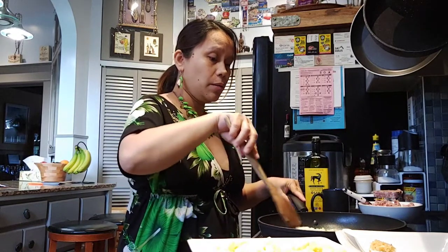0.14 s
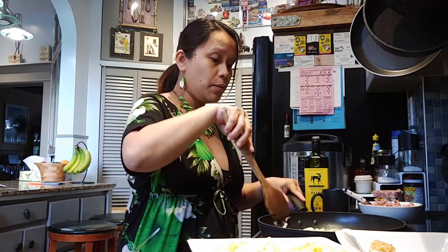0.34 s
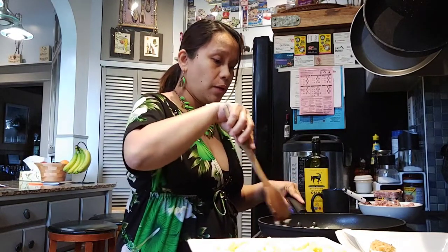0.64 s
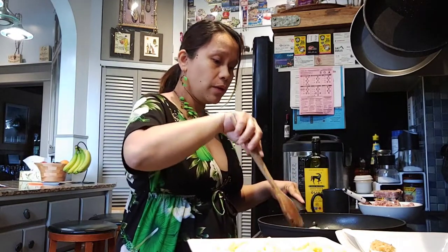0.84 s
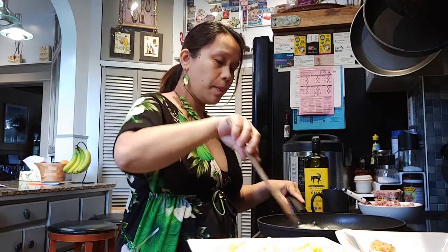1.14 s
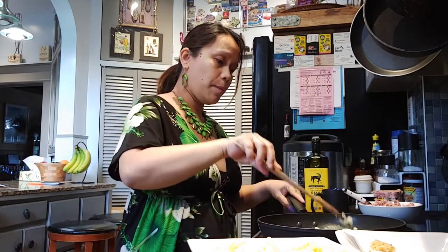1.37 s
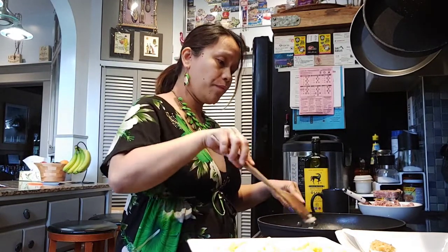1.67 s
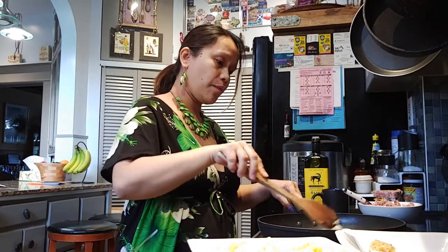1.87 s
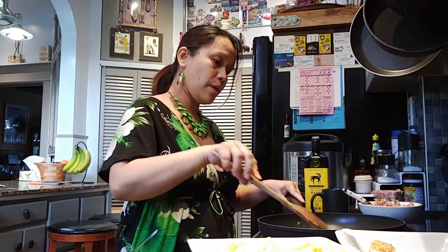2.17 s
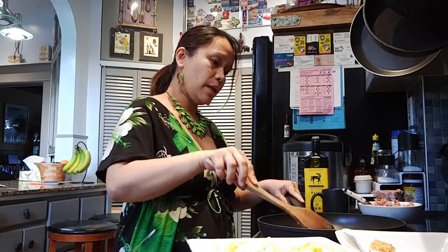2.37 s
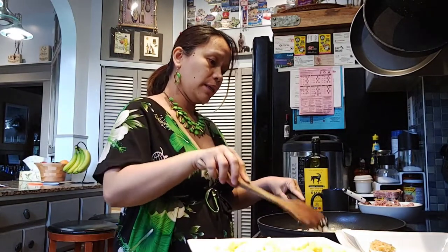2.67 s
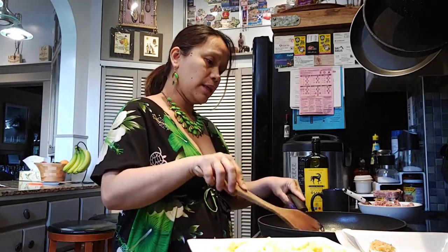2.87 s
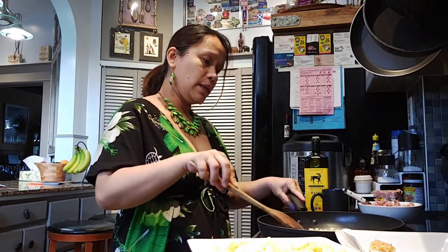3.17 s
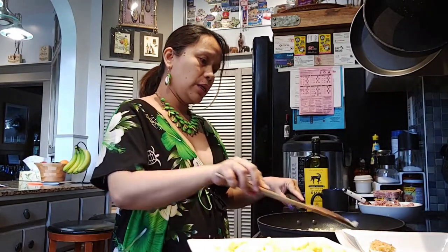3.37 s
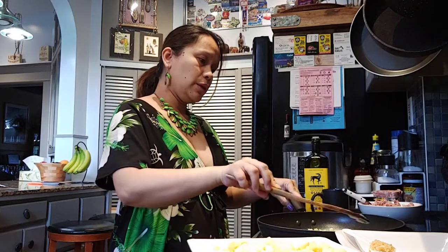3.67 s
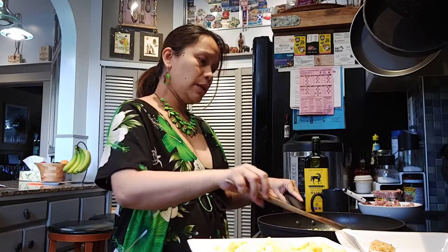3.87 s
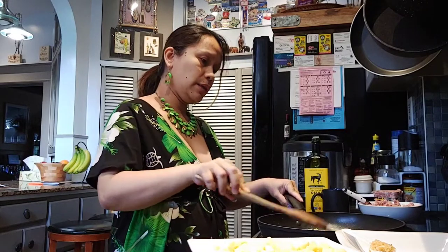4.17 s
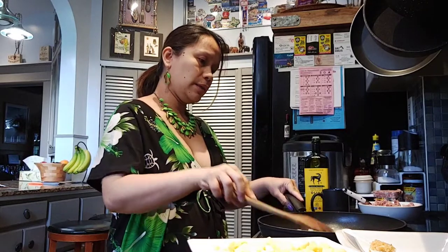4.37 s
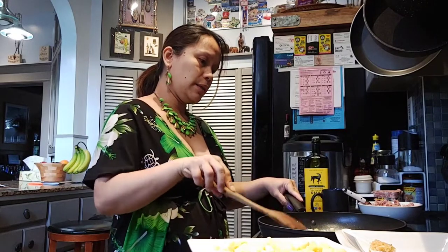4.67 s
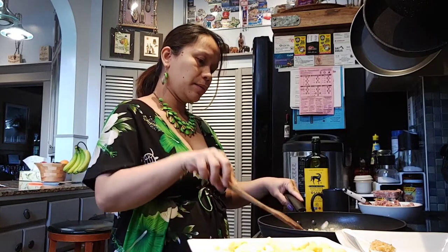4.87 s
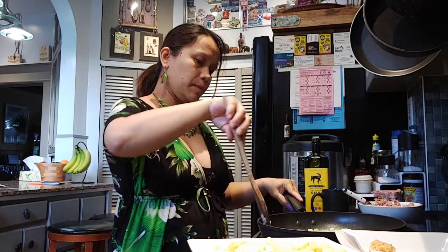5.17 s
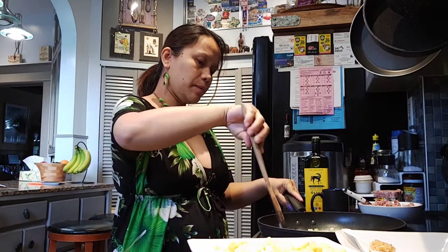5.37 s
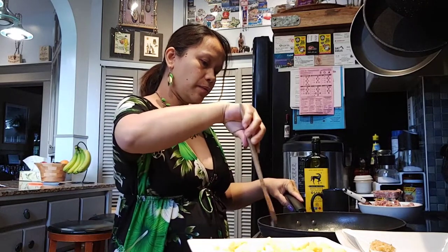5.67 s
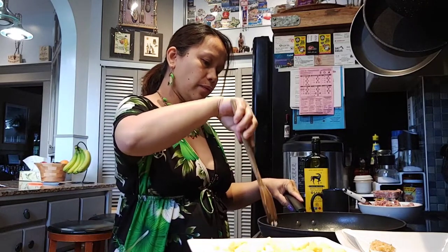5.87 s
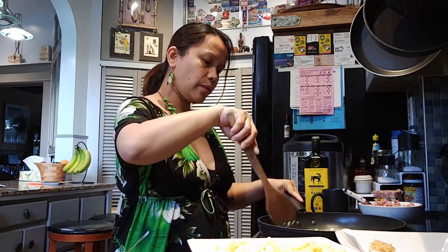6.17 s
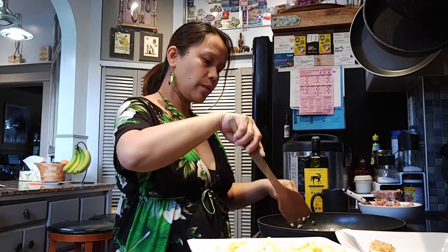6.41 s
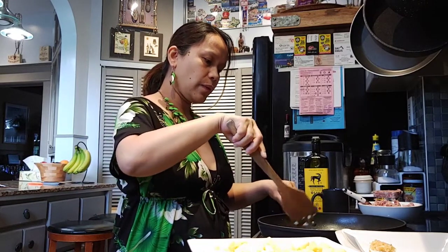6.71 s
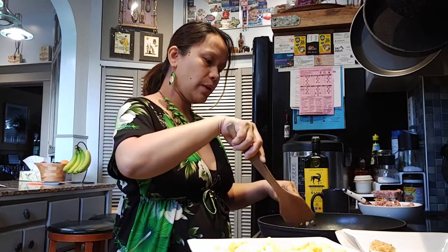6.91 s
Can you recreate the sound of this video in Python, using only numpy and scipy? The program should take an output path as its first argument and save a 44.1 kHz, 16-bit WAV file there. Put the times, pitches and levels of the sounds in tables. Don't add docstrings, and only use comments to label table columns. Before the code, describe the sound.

Close stereo sound of a wooden spatula stirring onions in a metal frying pan in a small tiled kitchen. A fine, bright sizzle and lower wet crackle run throughout, swelling briefly with the strokes, above quiet low room air and a faint appliance hum. Two firm woody knocks come at about 0.1 s, another at 0.5, with gritty scraping until 0.9. A ringing edge tap at 1.0 leads into hard double knocks at 1.1. From 1.4 to 2.5 it is calmer, with soft pushes; a knock at 2.6 and taps at 2.8 and 3.1 follow. Soft hollow pan rocking leads to taps at 3.9 and 4.3. Knock and tap at 4.6, then a sharp cluster of fat spits at 4.7. Ringing taps at 5.1, 5.55 and 5.9 surround a knock at 5.4; a strong clack at 6.0, weaker bumps to 6.5, and a final tap at 7.0.

```python
import sys
import numpy as np
from scipy import signal
from scipy.fft import rfft, irfft, next_fast_len
from scipy.io import wavfile
from scipy.ndimage import uniform_filter1d, map_coordinates

SR = 44100
rng = np.random.default_rng(int(sys.argv[2]) if len(sys.argv) > 2 else 0)


def wrap_up_sound(samples):
    columns = np.atleast_2d(samples).T
    tamed = np.clip(columns, -1, 1)
    steps = np.round(tamed * 32767).astype(np.int16)
    wavfile.write(sys.argv[1], SR, steps)


def field_ratio(decibels):
    return 10 ** (np.asarray(decibels, dtype=float) / 20)


N = 310720


def unit(x):
    return x / np.sqrt(np.mean(x ** 2) + 1e-20)


def along(points, hz):
    f, v = np.transpose(points)
    return np.interp(np.log(hz + 1), np.log(f + 1), v)


def wobble(rate):
    knots = rng.standard_normal(int(N * rate / SR) + 4)
    return map_coordinates(knots, [np.arange(N) * rate / SR])


def bell(s, length):
    return np.exp(-(2 * (np.arange(N) / SR - s) / length) ** 2)


def filtered(x, response):
    m = next_fast_len(N + SR // 2)
    return irfft(rfft(x, m) * response(np.fft.rfftfreq(m, 1 / SR)), m)[..., :N]


def grains(per_second, spread_db):
    size = field_ratio(spread_db * np.minimum(rng.exponential(size=N), 3))
    sign = rng.choice([-1, 1], size=N)
    return unit(size * sign * (rng.random(N) < per_second / SR))


# (frequency [Hz], likeness [-1 to 1])
PORT_LIKENESS = [(25, 1), (60, 1), (130, 0.96), (290, 0.89), (640, 0.41), (1410, -0.089), (3100, -0.16),
                 (6820, -0.021), (15000, -0.011)]


def rush(spectrum, grain, per_second, spread_db):
    clicks = grains(per_second, spread_db)
    echoes = rng.standard_normal((2, 400)) * field_ratio(-60 * np.arange(400) / SR / 0.049)
    spray = unit(signal.fftconvolve(clicks[None], echoes, axes=1)[:, :N])
    pair = np.sqrt(1 - grain) * rng.standard_normal((2, N)) + np.sqrt(grain) * spray

    def mid_and_side(hz):
        angle = np.arccos(np.clip(along(PORT_LIKENESS, hz), -1, 1)) / 2
        return field_ratio(along(spectrum, hz)) * [np.cos(angle), np.sin(angle)]

    mid, side = filtered(pair, mid_and_side)
    return unit(np.array([mid + side, mid - side]))


def ring(modes, t, scatter_db, attack, rough=0):
    hz, db, t60 = np.transpose(modes)[..., None]
    strength, detune = np.clip(rng.standard_normal((2, len(modes), 1)), -1.5, 1.5)
    blur = rough * np.cumsum(rng.standard_normal((len(modes), len(t))), axis=1) / np.sqrt(SR)
    phase = 2 * np.pi * hz * (1 + 0.0055 * detune) * t + blur
    tones = field_ratio(db + scatter_db * strength - 60 * t / t60) * np.sin(phase)
    return (tones[::2].sum(0) - tones[1::2].sum(0)) * (1 - np.exp(-t / attack))


def struck(modes, levels):
    return [(hz, db, t60) for (hz, t60), db in zip(modes, levels)]


def joined(modes, own):
    return [m for m in modes if abs(m[0] / own[0] - 1) > .12] + [own]


# (frequency [Hz], level [dB])
FLOOR_SLAP = [(100, 3), (190, -29), (320, -4), (560, -1.5), (900, -1), (1500, -5), (2600, -3.5),
              (3400, -23), (4200, -14), (5500, -27.5), (6500, -12.5), (9000, -58), (16000, -80)]


def slap(t, t60, tilt_db, spectrum=FLOOR_SLAP):
    hz = np.fft.rfftfreq(len(t), 1 / SR)
    colour = field_ratio(along(spectrum, hz) + tilt_db * np.clip(np.log2((hz + 1) / 1100), 0, 1))
    noise = unit(irfft(rfft(rng.standard_normal(len(t))) * colour, len(t)))
    return noise * field_ratio(-60 * t / t60) * (1 - np.exp(-t / 0.00037))


# (frequency [Hz], t60 [s])
ROOM_DECAY = [(100, 0.28), (400, 0.41), (800, 0.3), (1500, 0.36), (5000, 0.16), (12000, 0.074)]


def room(x):
    hz, t, z = signal.stft(rng.standard_normal((2, SR // 3)), SR, nperseg=256)
    tail = signal.istft(z * field_ratio(-60 * t / along(ROOM_DECAY, hz)[:, None]), SR, nperseg=256)[1]
    t = np.arange(tail.shape[1]) / SR
    early = 1 + 0.63 / (1 + np.exp((t - .018) / 0.0046))
    tail = tail * (1 - np.exp(-t / 0.0047)) * early
    bass = signal.filtfilt(*signal.butter(2, 520, fs=SR), tail)
    z = rfft(tail - 0.94 * (bass - bass[0]))
    z /= np.sqrt(np.abs(uniform_filter1d(np.abs(z) ** 2, size=15, axis=1)) + 1e-12)
    tail = irfft(z, len(t)) * np.clip((t[-1] - t) / .12 - .5, 0, 1)
    return signal.fftconvolve(x[None], tail / np.linalg.norm(tail[0]), axes=1)


def add(out, s, direct, wet_db, pan_db=0, deep=0):
    start = direct * field_ratio(-60 * np.arange(len(direct)) / SR / .045)
    energy = np.linalg.norm(direct)
    wet = field_ratio(wet_db) * room(start * energy / np.linalg.norm(start))
    wet[:, :len(direct)] += direct
    wet *= energy * np.sqrt(1 + field_ratio(2 * wet_db)) / np.linalg.norm(wet, axis=1, keepdims=True)
    wet[:, :len(direct)] += deep
    k = max(round(s * SR), 0)
    out[:, k:k + wet.shape[1]] += wet * field_ratio([[pan_db / 2], [-pan_db / 2]])


# (frequency [Hz], level [dB per Hz])
KITCHEN_AIR = [(15, -24), (25, -10), (54, -7.5), (98, -7.5), (134, -9), (184, -25.5), (301, -16),
               (345, -17.5), (395, -26), (494, -15), (667, -26.5), (848, -11.5), (900, -13), (1170, -52),
               (1980, -120)]
# (frequency [Hz], level [dB rms])
HUM = [(40, -56), (80.5, -60.5)]


def kitchen():
    t = np.arange(N) / SR
    sway_db, air_db = 1.5 * wobble(2.5), 2 * wobble(5)
    hum = np.zeros(N)
    for hz, db in HUM:
        hum += field_ratio(db + 4.0 + sway_db) * np.sin(2 * np.pi * hz * t + 0.89 * wobble(2.93))
    air = field_ratio(-55.5 + air_db) * rush(KITCHEN_AIR, grain=0, per_second=100, spread_db=1.5)
    return hum * field_ratio([[.4], [-.4]]) + air


# (frequency [Hz], level [dB per Hz])
FIZZ = [(2240, -63), (3800, -40), (4180, -24), (4520, -6.5), (5100, -10), (5650, -16), (6570, 1.5),
        (6890, -1.5), (7680, -14), (9140, -8), (11300, -18.5), (12600, -8), (14800, -11.5), (15300, -6.5),
        (16000, -29)]
# (frequency [Hz], level [dB per Hz])
CRACKLE = [(350, -30), (600, -12), (995, -7.5), (1090, -6), (1180, -3), (1300, -6), (2290, 1.5), (2740, 1),
           (5000, -4.5), (6500, -7), (11000, -120)]
# (time [s], length [s], swell [dB])
TURNS = [(0.132, 0.21, 2), (0.544, 0.11, 2.5), (0.774, 0.1, 1.5), (1.01, 0.072, 4), (1.223, 0.21, 3),
         (1.497, 0.26, 4.5), (1.83, 0.2, 4), (2.11, 0.19, 4), (2.6, 0.86, 0.94), (3.175, 0.13, 3),
         (3.564, 0.11, 1), (3.83, 0.068, 1.5), (4.1, 0.47, 3.5), (4.578, 0.15, 1), (4.793, 0.26, 2.5),
         (5.12, 0.29, 0.5), (5.61, 0.16, 2), (6.027, 0.089, 2.5), (6.6, 0.23, 1.5), (6.88, 0.17, 2.5)]


def sizzle():
    fizz_db, crackle_db = -44, -45
    splash_db, splash_s = -37.5, 0.16
    swell_db = sum(db * bell(s, length) for s, length, db in TURNS)
    splash = sum(field_ratio(db + splash_db) * bell(s + splash_s / 2, splash_s) for s, db, *_ in KNOCKS + TAPS)
    surge = wobble(19)
    fizz = rush(FIZZ, grain=0.25, per_second=1200, spread_db=-2.0)
    fizz = field_ratio(fizz_db + swell_db + 0.23 * surge + 0.52 * wobble(40)) * fizz
    crackle = rush(CRACKLE, grain=0.17, per_second=600, spread_db=-0.5)
    crackle = field_ratio(0.5 * surge + 0.76 * wobble(25)) * crackle
    return fizz + (field_ratio(crackle_db + swell_db) + splash) * crackle


# (time [s], peak level [dB], low part [dB])
SPITS = [(0.4214, -26, -21), (0.6747, -32, -5.5), (1.382, -27, -15), (2.467, -34, -8), (3.7733, -26, -27),
         (4.143, -23, -19), (4.592, -25, -23), (4.68, -29, -7), (4.7048, -15.5, -16), (4.7075, -13.5, -11),
         (4.7195, -14, -27), (4.8745, -23, -21), (0.1096, -27, -20), (0.9228, -27.5, -12),
         (5.3303, -28, -20), (5.582, -23, -13), (6.384, -27.5, -20), (6.4767, -30, -16), (6.862, -29, -10)]


def spits():
    high, low = np.zeros((2, N + SR)), np.zeros((2, N + SR))
    t = np.arange(SR // 20) / SR
    for s, db, low_db in SPITS:
        puff = rng.standard_normal((2, len(t))) * field_ratio(-60 * t / 0.01) * (1 - np.exp(-t / 0.00054))
        add(high, s, field_ratio(db + 11.0) * puff[0], wet_db=-5)
        add(low, s, field_ratio(db + low_db + 16.0) * puff[1], wet_db=0)
    bright = filtered(high[:, :N], lambda hz: field_ratio(along(FIZZ, hz)) / (1 + (hz / 9500) ** 8))
    return bright + filtered(low[:, :N], lambda hz: field_ratio(along(CRACKLE, hz)))


# (time [s], length [s], level [dB])
DRAGS = [(0.156, 0.26, -45), (0.517, 0.19, -45.5), (0.77, 0.2, -48.5), (1.01, 0.019, -43),
         (1.133, 0.017, -37), (1.297, 0.11, -49), (3.072, .03, -54), (4.279, 0.022, -46),
         (6.005, 0.019, -52), (2.848, 0.33, -52), (3.905, 0.36, -56), (4.75, 0.1, -45), (5.495, 0.52, -54),
         (6.04, 0.32, -48), (6.347, 0.24, -55.5), (7.03, 0.13, -57)]
# (frequency [Hz], level [dB], t60 [s])
PAN = [(240, -13.5, 0.28), (291, -3, 0.31), (353, -8, 0.2), (418.4, -16, 0.21)]
# (frequency [Hz], level [dB], t60 [s])
WOOD = [(576, -13.5, 0.086), (748, -13.5, 0.047), (812, -4.5, 0.035), (998, -3, 0.027), (1380, -5, 0.023)]


def scrape():
    t = np.arange(SR // 4) / SR
    body = .6 * ring(PAN, t, scatter_db=0, attack=.001, rough=8)
    body += 1.5 * ring(WOOD, t, scatter_db=0, attack=.0004, rough=15)
    slips = grains(per_second=980, spread_db=11.5)
    drag = unit(signal.fftconvolve(slips, body)[:N])
    strokes = sum(field_ratio(db + 0.5) * bell(s, length) for s, length, db in DRAGS)
    return strokes * unit(drag + 0.062 * room(drag)[:, :N])


# (time [s], frequency [Hz], level [dB])
CLEAR_TONES = [
    (0.685, 2350, -43),
    (1.014, 900, -32),
    (5.109, 883, -39),
    (5.108, 2410, -44),
    (5.108, 2950, -46),
    (5.557, 892, -35),
    (5.557, 2410, -33),
    (5.906, 2380, -44),
    (5.905, 830, -40),
]


def clear_tones():
    out, t = np.zeros((2, N + SR)), np.arange(SR // 4) / SR
    for s, hz, db in CLEAR_TONES:
        add(out, s, ring([(hz, db, .2)], t, scatter_db=0, attack=.004, rough=3), wet_db=-12)
    return out[:, :N]


# (time [s], peak level [dB], hardness [dB], pan floor [dB])
EXTRA_CONTACTS = [(0.084, -33, -8, -8), (0.131, -28.5, -6, 3.5), (0.494, -28.5, -4, 3.5), (1.021, -30, 5, -14),
                  (1.0983, -18, -8, 1), (1.1572, -30, -8, 5.5), (1.182, -36, -8, 0), (2.617, -30, -7, -2),
                  (3.093, -30, -14, -17), (4.298, -32, -6, -11), (4.565, -29, -10, -18), (4.657, -37, -4, 2),
                  (5.392, -36, -8, -2), (6.027, -27, -6, 1), (2.812, -34.5, -20, 3), (5.3829, -27, -6, -10),
                  (6.1675, -31.5, -25, -7), (7.006, -32, -18, -2), (1.1472, -22.5, 1, -20)]
FLOOR_ROUGH, BODY_ROUGH = 5, 11


def extra_contacts():
    out, t = np.zeros((2, N + SR)), np.arange(SR // 4) / SR
    for s, db, hard_db, floor_db in EXTRA_CONTACTS:
        low = field_ratio(floor_db - 5) * ring(PAN, t, scatter_db=2, attack=0.0075, rough=FLOOR_ROUGH)
        add(out, s, field_ratio(db) * (low + slap(t, t60=0.045, tilt_db=hard_db)), wet_db=0.5)
    return out[:, :N]


# (time [s], peak level [dB], pan floor [dB], hollow tone [Hz])
PUSHES = [(0.363, -41, 2, 272.6), (0.39, -36, -22, 194), (0.683, -35, 6, 250), (0.731, -35, 1, 295),
          (1.017, -32, 2.5, 240), (1.478, -47, 6, 290), (1.755, -43, -32, 288), (2.02, -47, -2, 296),
          (2.258, -39, -14, 176), (2.527, -45, 5, 343), (3.081, -37, -18, 346), (3.157, -43, 11, 337),
          (3.457, -42.5, -22, 336), (3.516, -50, -44, 324), (3.581, -57, 7, 345), (3.762, -40.5, -4, 288),
          (3.901, -52, 5, 316), (3.981, -31, -3.5, 347), (4.198, -32, -12, 178), (4.273, -34.5, -11, 291),
          (4.555, -39, -21, 353), (5.108, -58, -30, 300), (5.202, -53, -15, 211), (5.557, -38, -18, 288),
          (5.702, -51, -15, 286), (5.901, -30, 2.5, 291), (6.5, -39, -26, 253), (6.599, -58, -29, 241.5),
          (6.762, -38.5, -20, 231), (7, -32, -1, 244)]
# (frequency [Hz], level [dB], t60 [s])
ROCK = [(84.6, 12, 0.11), (109, 4.5, 0.16)]


def pushes():
    out, t = np.zeros((2, N + SR)), np.arange(SR // 4) / SR
    for s, db, floor_db, hz in PUSHES:
        modes = joined(PAN, (hz, 3, .12))
        low = field_ratio(db + floor_db - 6.5) * ring(modes, t, scatter_db=0, attack=0.0041, rough=FLOOR_ROUGH)
        rocking = field_ratio(db - 6.5) * ring(ROCK, t, scatter_db=0, attack=0.0082)
        add(out, s, low, wet_db=-2.0, deep=rocking)
    return out[:, :N]


# (time [s], peak level [dB], depth [dB], low tone [Hz])
TAPS = [(0.001, -37.5, 0, 606), (0.352, -28, -29, 480), (0.683, -24.5, -12, 550), (1.012, -19, -15, 530),
        (2.811, -27, -3, 474), (3.0831, -21.5, -19, 650), (3.922, -35.5, -28, 600), (4.29, -20, -8.5, 544),
        (4.5586, -23, -24, 636), (5.106, -27, -9.5, 515), (5.555, -24.5, -13, 534),
        (5.903, -28.5, -18, 560), (7.0075, -24.5, -11, 486)]
# (frequency [Hz], t60 [s])
WALL = [(735, .045), (840, .04), (890, .045), (1075, .035), (1255, .03)]
WALL_MIX = [(8, -13, -1, -15, -18), (-4, 1, -17, -10, -24), (-12, -0.5, -0.5, -6, -19),
            (-9, -14, -4, -25, -12), (2.5, -11, -7, -14, -23), (1, 5, -0.5, -2.0, -4.5),
            (-6, -8, -4, -11, -3), (2, -2, -15, -7, -1), (3, -1.5, -16, -6, -4.5),
            (-5.5, -8, -1.5, -13, -11), (0, -7, -5, -30, -24), (2.5, 6, -14, -13, -19),
            (-10, -0.5, -5.5, -16, -21)]
# (frequency [Hz], t60 [s])
UPPER = [(1865, .025), (2230, .03), (2365, .07), (2475, .04), (2965, .03)]
UPPER_MIX = [(-1, -18, -14, -12, -20), (-16, -15, -20, -20, -17), (-4, -7, -16, -6, -15),
             (-7, -16, -3.5, -25, -11), (-19, -27, -26, -25, -28), (-0.5, -20, -26, -24, -32),
             (-4, -15, -17, -12, -20), (-2.5, -3.5, -13, -10, -30), (1.5, -19, -18, -23, -28),
             (-9, -15, -6, -3, 2.5), (-3, -1, -13, -9, -10), (-24, -25, -2.5, 3, -20),
             (-27, -28, -29, -27, -27)]
# (frequency [Hz], level [dB])
WALL_SLAP = [(100, -30), (220, -24), (330, -10.5), (560, 0.5), (900, -2.5), (1550, -1), (2600, -1.5),
             (3200, -13), (6500, -18), (16000, -80)]


def taps():
    out, t = np.zeros((2, N + SR)), np.arange(SR // 4) / SR
    for (s, db, depth_db, low_hz), wall, tones in zip(TAPS, WALL_MIX, UPPER_MIX):
        tone = field_ratio(4.0) * ring(struck(WALL, wall), t, scatter_db=0, attack=0.00061, rough=BODY_ROUGH)
        low = field_ratio(depth_db + 2.5) * ring(PAN, t, scatter_db=0, attack=0.014, rough=FLOOR_ROUGH)
        upper = field_ratio(5.5) * ring(struck(UPPER, tones), t, scatter_db=0, attack=0.0012, rough=10)
        side = ring([(low_hz, 0.6 * depth_db, .07)], t, scatter_db=2, attack=0.00053, rough=BODY_ROUGH)
        contact = 0.6 * slap(t, t60=0.045, tilt_db=max(tones) + 1, spectrum=WALL_SLAP)
        add(out, s, field_ratio(db - 2.0) * (tone + low + upper + side + contact), wet_db=-1.5, pan_db=1.0)
    return out[:, :N]


# (time [s], peak level [dB], hardness [dB])
KNOCKS = [(0.075, -19.5, -12), (0.122, -17.5, -7), (0.4866, -17, -11), (0.809, -28, -14),
          (1.092, -16.5, -14.5), (1.147, -15, -4), (1.403, -41.5, -13), (1.4392, -25, -20),
          (2.609, -24, -8), (4.649, -21, -13), (4.778, -42, -23), (4.856, -43.5, -11), (5.304, -29, -29),
          (5.382, -21.5, -10.5), (6.015, -15, -7), (6.168, -28, -36), (6.3, -27.5, -13),
          (6.457, -34.5, -34)]
# (frequency [Hz], t60 [s])
FLOOR = [(243, 0.11), (295, 0.2), (342, 0.095), (415, 0.12), (490, 0.084)]
FLOOR_MIX = [(-20, -5.5, -12, -12.0, -17), (-20, -16, -9, -6.5, -22), (-14, -7.5, -3, -10, -9),
             (-26, -0.5, -19, -6, -19), (-17, -20, -16, -13, -2.5), (-33, -5.5, -5, -9, -18),
             (4, 4, 2.0, -12, 2), (-9, -6, -25, -23, -31), (-11, -2, 1.5, -5.5, -11),
             (-24, -4.5, -3, -11, -15), (-7, 0, -6, -1.0, 2), (-12, 6.5, 7.5, -2, -11.0),
             (-4.5, -8, -13, -24, -16), (-14, -9, -1, -16, -18.0), (-14, -9, -4, -18, -25),
             (-4, -9, -6, -21, -6), (-18, -5, -1.5, -13, -24), (1.5, -12, -3, -28, -1.5)]
# (frequency [Hz], t60 [s])
BLADE = [(678, .04), (880, .045), (1065, .035), (1136, .035), (1257, .03)]
BLADE_MIX = [(-8, -7, -8.0, -7, 1.5), (-13, 5, 0, 2, -2), (-20, -4, -11, -3, -4), (-7, -20, -2, -10, -9),
             (-5, -16, -8, -3, -4), (-9, -4, -5, 1, 1.5), (-7.0, 2, -3.0, 1, -6), (-1.5, -4.5, 2, -2, -14),
             (-5, 5.5, -6, 4, -7.5), (-3, 2, -9, -7, -2), (-1, -1, -13.0, -9, -5), (-1, -1, -4, -15, -8),
             (-21, -1, -20, -18, -6), (-11, 2.5, 2, -11, 3.5), (-13, -12, 2.5, -7, -8),
             (-2, 2, -17, -18, -19.0), (-9, 0, 1, -4.0, -5), (-23, -3, -19, -26, -24.0)]
# (frequency [Hz], level [dB], t60 [s])
STOVE = [(90.4, 2, 0.43), (113.8, 3, 0.23)]
# (frequency [Hz], level [dB], t60 [s])
RIM = [(1470, -1, 0.025), (1686, 0, 0.032), (1880, 3.5, 0.047), (2050, -1, 0.042), (2186, 0, 0.022),
       (2386, -1, 0.026), (2500, -15, 0.025), (2647, 10, 0.01), (2740, -10, 0.015), (3010, 0, 0.022),
       (3260, -3.5, 0.023)]
# (frequency [Hz], level [dB])
CRACK = [(2000, -40), (3300, 5), (4200, -2), (5200, -1), (6500, -8), (7800, -20), (9500, -30), (16000, -60)]


def knocks():
    out, t = np.zeros((2, N + SR)), np.arange(SR // 4) / SR
    pressed = 0.4 + (1 - 0.4) / (1 + np.exp((t - 0.065) / 0.0054))
    for (s, db, hard_db), floor, blade in zip(KNOCKS, FLOOR_MIX, BLADE_MIX):
        tone = field_ratio(2.5) * ring(struck(BLADE, blade), t, scatter_db=0, attack=0.00077, rough=BODY_ROUGH)
        between = field_ratio(-3) * ring(WOOD, t, scatter_db=0, attack=0.00031, rough=10.2)
        thud = field_ratio(-22.5 + 0.69 * db) * ring(STOVE, t, scatter_db=2, attack=0.0017)
        crack = field_ratio(3.5 + 1.94 * hard_db) * slap(t, t60=0.018, tilt_db=0, spectrum=CRACK)
        low = field_ratio(4.0) * ring(struck(FLOOR, floor), t, scatter_db=0.5, attack=0.0044, rough=FLOOR_ROUGH)
        clack = field_ratio(hard_db + 4.5) * ring(RIM, t, scatter_db=1.5, attack=.0007, rough=26)
        contact = 0.84 * slap(t, t60=0.077, tilt_db=hard_db + 6)
        knock = tone + between + low * pressed + clack + crack + contact
        add(out, s, field_ratio(db - 5) * knock, wet_db=-2.5, pan_db=0.9, deep=thud)
    return out[:, :N]


# (frequency [Hz], lead of the left port [radians])
LEFT_LEAD = [(120, 0), (400, 0.2), (550, 1.1), (800, -0.5), (1100, 0.6), (1450, 2.0), (1700, 2.4),
             (2100, 1.4)]


def scene():
    rest = kitchen() + sizzle() + scrape()
    near = spits() + clear_tones() + extra_contacts() + pushes() + taps() + knocks()
    return rest + filtered(near, lambda hz: np.exp(1j * np.outer([.5, -.5], along(LEFT_LEAD, hz))))


def roll_off(x):
    return signal.sosfilt(signal.butter(12, 17010, fs=SR, output="sos"), x)


# (frequency [Hz], left over right [dB])
PORT_COLOUR = [(60, -3.5), (92, 1.5), (140, 2), (210, 4.5), (330, 0), (500, -3.5), (770, 4), (1170, -5),
               (1790, 0), (2740, 0.5), (4190, -5), (6410, 13.5), (9810, 4.5), (15000, 0.5)]


def record(dry):
    def microphone(hz):
        colour = field_ratio(np.outer([.5, -.5], along(PORT_COLOUR, hz)))
        return colour * (hz < 15800) / np.sqrt(1 + (36 / (hz + 1)) ** 8)

    ports = filtered(dry, microphone)
    return roll_off(ports)


dry = scene()
out = record(dry)
wrap_up_sound(out)
```